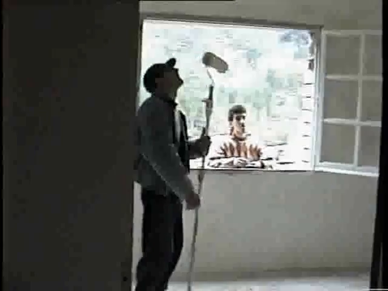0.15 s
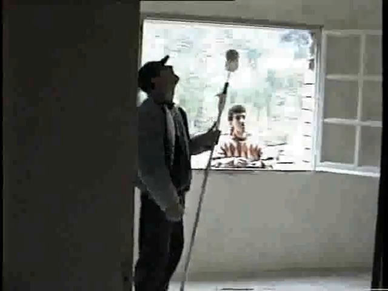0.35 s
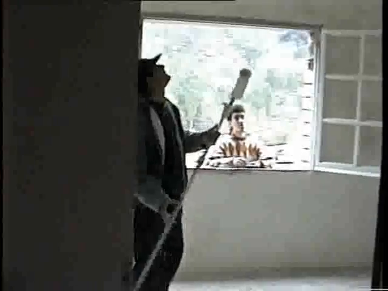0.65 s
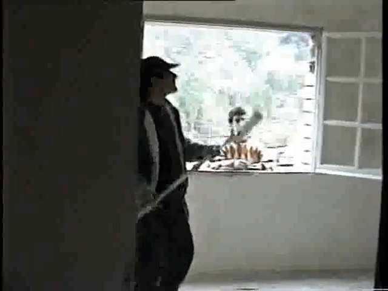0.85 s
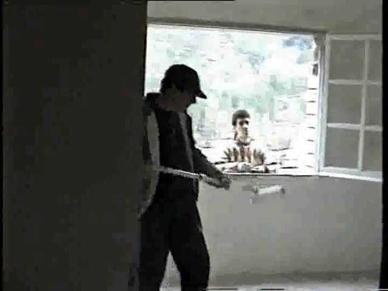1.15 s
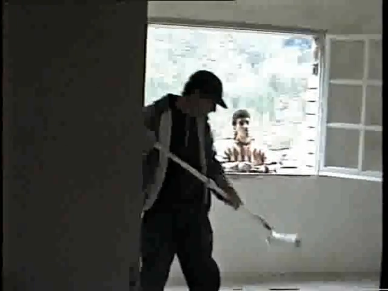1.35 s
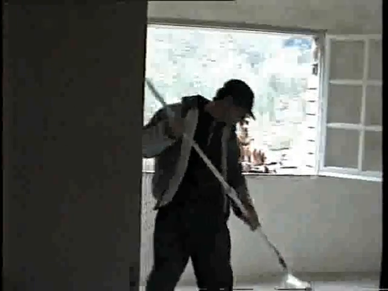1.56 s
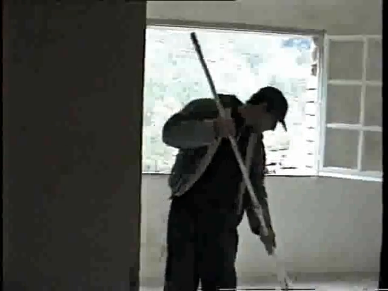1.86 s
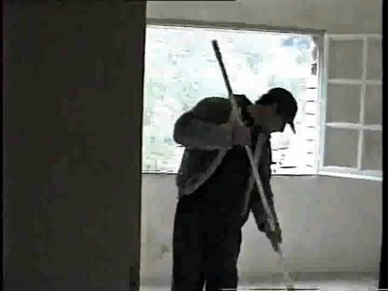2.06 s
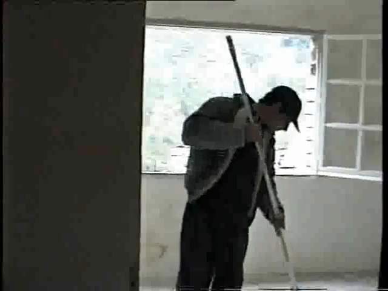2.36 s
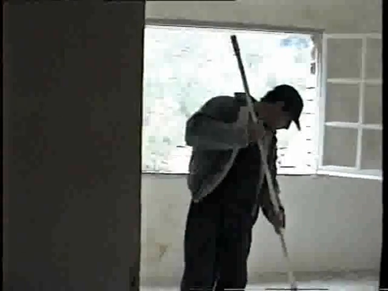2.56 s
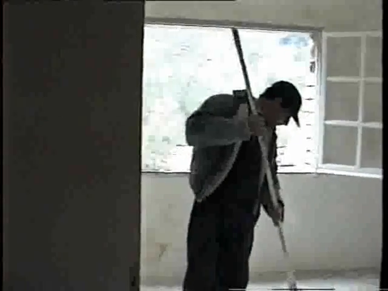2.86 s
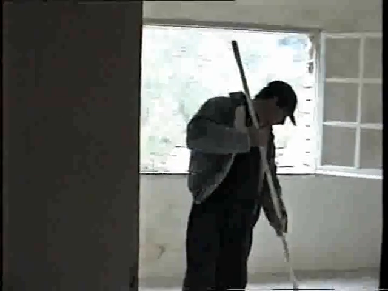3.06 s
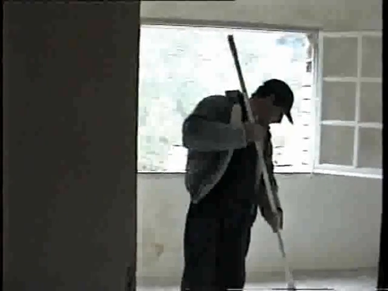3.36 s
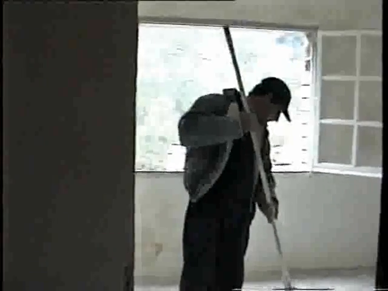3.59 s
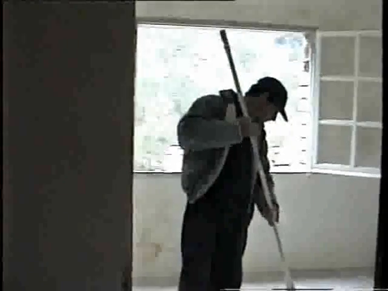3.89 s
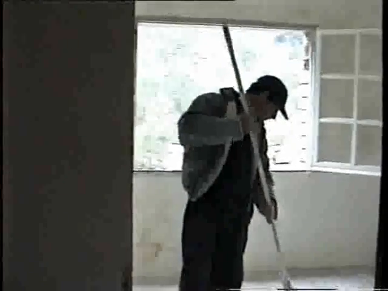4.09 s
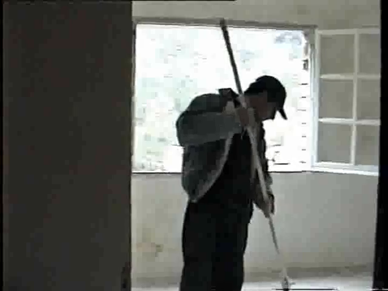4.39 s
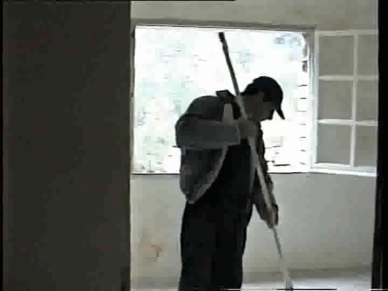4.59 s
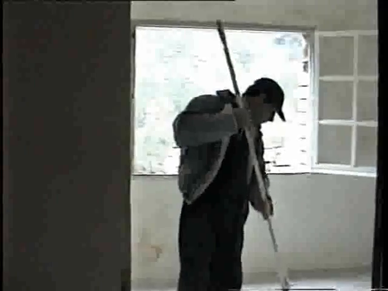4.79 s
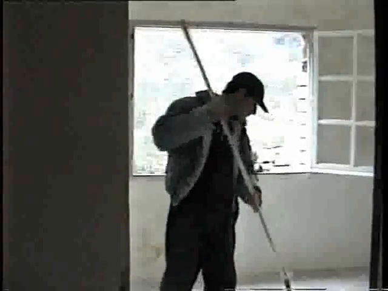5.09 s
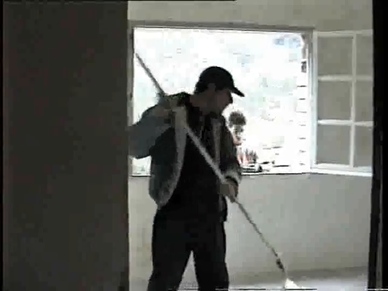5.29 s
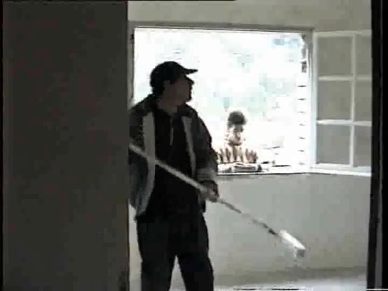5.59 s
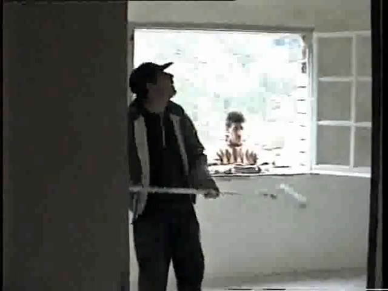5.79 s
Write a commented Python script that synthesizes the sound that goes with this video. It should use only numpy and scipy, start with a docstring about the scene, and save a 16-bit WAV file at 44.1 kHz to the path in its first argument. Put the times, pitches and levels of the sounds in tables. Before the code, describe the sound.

A painter's roller knocks down into a hollow tray and swishes wetly six times, after pole clinks and footsteps, all in strong room echo.

```python
"""In a bare, echoing room a painter lowers a roller on a long metal pole: the pole clanks, shoes scuff, clothes brush.
He turns round with a growing shuffle and rustle, then six strokes swish wetly in a paint tray that knocks and rings.
Contacts are dying bursts of tiny snaps, coloured by the body they excite; wet strokes are denser snaps that follow speed.
Outdoor air murmurs throughout; a microphone in the doorway hears mostly echo, and its gain dips at loud moments."""
import sys
import numpy as np
from scipy import signal
from scipy.fft import rfft, irfft, next_fast_len
from scipy.io import wavfile
from scipy.ndimage import uniform_filter1d, map_coordinates

SR = 44100
rng = np.random.default_rng(int(sys.argv[2]) if len(sys.argv) > 2 else 0)


def transcribe(u):
    """Save the signal u as a 16-bit wav file named by the first command-line argument.

    u: samples, shape (n,) or (channels, n), limited to [-1, 1]; the rate is SR.
    q: integer samples, one column per channel.
    """
    v = np.clip(np.atleast_2d(u).T, -1, 1)
    q = np.round(v * 32767).astype(np.int16)
    wavfile.write(sys.argv[1], SR, q)


N = 261954

# strokes in the tray: (landing time [s], landing [dB], splat [dB], rebound [dB], wait before the push [s],
# push length [s], swish [dB], far wall [dB], rebound ring [Hz])
STROKES = [(2.117, -10, -14.5, -6.5, 0.0067, 0.19, -18.5, -7.5, 2400),
           (2.997, -12.5, -25, -13, 0.0017, 0.34, -10, -11.5, 1000),
           (3.762, -28, -41, -27.5, 0.022, 0.29, -11.5, -15, 860),
           (4.375, -12.5, -24.5, -15, 0.049, 0.25, -10.5, -10, 426),
           (5.128, -14.5, -30.5, -17, 0.017, 0.25, -10.5, -29, 1630),
           (5.663, -12, -16.5, -6.5, 0.0077, 0.17, -13, -10, 1620)]
# footfalls and shifts of weight: (time [s], boom [dB], scuff [dB], boom ring [Hz])
FOOTSTEPS = [(0.005, -17, -20, 390), (0.087, -24.5, -32.5, 278), (0.422, -59, -32.5, 230),
             (0.71, -54, -31.5, 240), (0.853, -41, -21.5, 430), (1.22, -49, -29.5, 237),
             (1.479, -40, -26.5, 430), (2.398, -37.5, -50, 116), (3.276, -31.5, -26, 330),
             (4.554, -27.5, -31, 315)]
# spectrum of soft, bright rustles: (frequency [Hz], relative level [dB])
RUSTLE_SPECTRUM = [(150, -30), (500, 17), (1500, 12), (2400, 6), (3600, 5.5), (5000, 4), (9000, 0.5),
                   (12000, -6), (15000, -22)]
REBOUND_AFTER_S = 0.06  # from landing to rebound


def amp(db):
    """Decibels to an amplitude factor."""
    return 10 ** (np.asarray(db) / 20)


def unit(x):
    """Scale to rms 1."""
    return x / np.sqrt(np.mean(x ** 2) + 1e-20)


def along(points, hz):
    """Interpolate (frequency, value) points on a log frequency axis."""
    f, v = np.transpose(points)
    return np.interp(np.log(hz + 1), np.log(f + 1), v)


def coloured(x, spectrum, modes=(), size=8192):
    """Pass x through a causal body of power gain 1: a broad spectrum with resonant peaks on it."""
    hz = np.fft.rfftfreq(size, 1 / SR)
    db = along(spectrum, hz)
    for f, width, peak_db in modes:
        db = db + peak_db / (1 + (2 * (hz - f) / width) ** 2)
    # folding the cepstrum gives minimum phase: the body answers without delay
    cepstrum = irfft(np.log(unit(amp(db)) + 1e-6))
    cepstrum[1:size // 2] *= 2
    cepstrum[size // 2 + 1:] = 0
    response = irfft(np.exp(rfft(cepstrum)))
    return signal.fftconvolve(x, response)[:N]


def grains(rate, spread_db):
    """Tiny snaps of random size, rate a second on average, rms 1."""
    happens = rng.random(N) < rate / SR
    sizes = rng.standard_normal(N) * amp(spread_db * rng.standard_normal(N))
    return unit(happens * sizes)


def wobble(rate):
    """A smooth random curve, rate knots a second."""
    knots = rng.standard_normal(int(N * rate / SR) + 4)
    return map_coordinates(knots, [np.arange(N) * rate / SR])


def contacts(rows, rate, weigh_s=0.064, rise_s=0.00067, ring_width_hz=55, ring_db=6):
    """Each (time, dB, decay time, optional ring Hz) is a dying chatter of snaps plus its resonant ring.

    Before the ring is added, the chatter has the energy of weigh_s seconds at that level."""
    out, t = np.zeros(N + SR), np.arange(SR // 2) / SR
    chatter = grains(rate, spread_db=0.5)
    for s, db, decay_s, *rings in rows:
        start = max(round(s * SR), 0)
        envelope = np.exp(-t / max(decay_s, 1e-3)) * (1 - np.exp(-t / rise_s))
        burst = np.roll(chatter, -start)[:len(t)] * envelope
        burst *= amp(db) * np.sqrt(weigh_s * SR) / np.linalg.norm(burst)
        for hz in rings:
            b, a = signal.iirpeak(hz, hz / ring_width_hz, fs=SR)
            burst = burst + amp(ring_db) * signal.lfilter(b, a, burst)
        out[start:start + len(t)] += burst
    return out[:N]


def roller(uneven_db=2.6):
    """Threads of wet paint tear off the nap, louder with speed; each landing and rebound adds a splat."""
    # wet nap spectrum: (frequency [Hz], relative level [dB])
    nap_spectrum = [(30, -19), (160, -18), (240, -4.5), (400, -6), (560, 0), (700, -7.5), (950, 2),
                    (1860, -3), (3200, -2), (3900, -4.5), (6000, -4), (8400, -3.5), (12200, -9),
                    (14900, -31.5)]
    push_late, push_sharp = 1.15, 1.01  # exponents: the speed arch peaks a little after the middle of the push
    splat_decay_s = 0.029
    rebound_splat_db = -12  # relative to the rebound's knock

    t, speed = np.arange(N) / SR, np.zeros(N)
    splats = []
    for s, _, splat_db, rebound_db, wait, push, swish_db, _, _ in STROKES:
        done = np.clip((t - s - wait) / push, 0, 1)
        arch = np.abs(np.sin(np.pi * done ** push_late)) ** push_sharp
        speed += amp(swish_db) * arch
        splats.append((s, splat_db, splat_decay_s))
        splats.append((s + REBOUND_AFTER_S, rebound_db + rebound_splat_db, splat_decay_s))
    tearing = speed * amp(uneven_db * wobble(45)) * grains(rate=5900, spread_db=5.0)
    return coloured(tearing + contacts(splats, rate=8700), nap_spectrum)


def tray(level_db=0.5):
    """The hollow tray clatters at each landing, rebound and far wall, and rings more clearly when it rocks."""
    # tray spectrum: (frequency [Hz], relative level [dB])
    tray_spectrum = [(60, -18), (150, -25), (230, -13.5), (340, -6), (450, -10), (650, -1.5), (850, 4.5),
                     (1080, 1.5), (1600, -1.5), (2200, -7), (3100, -13), (4200, -20), (8000, -25.5),
                     (14000, -64)]
    # tray resonances: (frequency [Hz], width [Hz], peak [dB])
    tray_modes = [(435.6, 14.6, 16), (520, 104, 10), (824, 7.6, -1), (1000, 54, -0.5), (1160, 7, 0),
                  (1144, 48, -17), (1490, 96, 0.5), (2240, 19, 3), (2620, 80, -1), (3250, 26, 9)]
    # the tray rocks on the floor: (time [s], level before level_db [dB], decay time [s], ring [Hz])
    tray_rocks = [(2.069, -22, 0.055, 447), (2.132, -8.5, 0.018, 1056), (2.19, -9.5, 0.12, 1520),
                  (2.61, -19.5, 0.17, 1147), (5.208, -16, 0.0059, 497), (5.324, -20, 0.09, 968),
                  (5.645, -24, 0.0036, 1140)]
    landing_decay_s, rebound_decay_s, wall_decay_s = 0.019, 0.019, 0.047
    landing_hz, wall_hz = 1053, 1157  # loudest ring of the tray's bottom and of its far wall
    wall_at = 0.78  # share of the push time gone when the roller meets the far wall

    knocks = []
    for s, landing_db, _, rebound_db, wait, push, _, wall_db, rebound_hz in STROKES:
        knocks.append((s, landing_db, landing_decay_s, landing_hz))
        knocks.append((s + REBOUND_AFTER_S, rebound_db, rebound_decay_s, rebound_hz))
        knocks.append((s + wait + wall_at * push, wall_db, wall_decay_s, wall_hz))
    clatter = contacts(knocks, rate=1000, ring_width_hz=48, ring_db=3.5)
    rocking = contacts(tray_rocks, rate=810, ring_width_hz=44, ring_db=11.5)
    return amp(level_db) * coloured(clatter + rocking, tray_spectrum, tray_modes)


def pole():
    """Knocks in the hands and a jar on the first landing bend the pole; its loose joint rattles the tube."""
    # pole knocks: (time [s], ring [dB], rattle [dB], decay time [s])
    pole_knocks = [(0.0, -23.5, -17.5, 0.0019), (0.217, -33.5, -35.5, 0.012), (1.206, -24, -52, 0.032),
                   (1.239, -20.5, -48, 0.016), (1.505, -24, -34, 0.065), (2.164, -19.5, -34, 0.04)]
    # pole spectrum: (frequency [Hz], relative level [dB])
    pole_spectrum = [(100, -58), (250, 0), (430, -2.5), (800, -6.5), (1500, -9.5), (2500, -22), (4000, -27),
                     (12000, -50)]
    # bending modes of pole and roller frame: (frequency [Hz], width [Hz], peak [dB])
    bending_modes = [(435, 52, 1), (673, 6.9, -2), (1015, 150, 7.5), (1365, 18, -11), (1593, 88, 12),
                     (2415, 170, 15), (4240, 120, 10), (6060, 220, 4)]
    # loose joint spectrum: (frequency [Hz], relative level [dB])
    rattle_spectrum = [(200, -11), (900, -18), (2000, 3.5), (5000, -8.5), (8000, -6.5), (11400, -12.5),
                       (12200, -32), (15000, -39)]
    # resonances of the hollow tube: (frequency [Hz], width [Hz], peak [dB])
    tube_modes = [(930, 25, 1), (2010, 64, 7.5), (3145, 150, 9), (4260, 88, 4.5), (5000, 170, 9.5),
                  (5870, 210, 13), (7900, 340, 9), (9000, 120, 10), (11150, 200, 11)]

    ring = contacts([(s, db, decay_s) for s, db, _, decay_s in pole_knocks], rate=490)
    rattle = contacts([(s, db, decay_s) for s, _, db, decay_s in pole_knocks], rate=1500)
    return coloured(ring, pole_spectrum, bending_modes) + coloured(rattle, rattle_spectrum, tube_modes)


def floor():
    """The floor booms in its low resonances under the painter's weight."""
    # floor spectrum under a foot: (frequency [Hz], relative level [dB])
    floor_spectrum = [(50, -61), (115, -6.5), (200, -3.5), (290, -1.5), (400, -11.5), (550, -23),
                      (1500, -24), (6000, -64)]
    # floor resonances: (frequency [Hz], width [Hz], peak [dB])
    floor_modes = [(230, 66, 12), (336, 61, 2.8)]
    boom_decay_s = 0.0085

    booms = [(s, db, boom_decay_s, hz) for s, db, _, hz in FOOTSTEPS]
    thuds = contacts(booms, rate=1700, ring_width_hz=44, ring_db=10.5)
    return coloured(thuds, floor_spectrum, floor_modes)


def painter(uneven_db=3):
    """Shoes scuff at each step; as he turns, ever louder, they shuffle and his jacket rustles."""
    # shoe scuff spectrum: (frequency [Hz], relative level [dB])
    scuff_spectrum = [(90, -22), (160, -12.5), (300, -3.5), (440, 4.5), (560, -7.5), (700, -6.5),
                      (1100, -13), (1500, -13), (2200, -24), (3300, -24.5), (4200, -35), (9000, -35),
                      (14000, -49)]
    scuff_decay_s = 0.0085
    turn_start_s, turn_length_s, turn_fade_s = 0.933, 0.635, 0.042
    turn_start_db, turn_grows_db_per_s = -33, 14.5
    jacket_db = -14  # relative to the shuffle

    t = np.arange(N) / SR - turn_start_s
    turning = np.clip(np.minimum(t, turn_length_s - t) / turn_fade_s, 0, 1)
    motion = turning * amp(turn_start_db + turn_grows_db_per_s * t + uneven_db * wobble(13.6))
    scuffs = contacts([(s, db, scuff_decay_s) for s, _, db, _ in FOOTSTEPS], rate=1200)
    shuffle = motion * grains(rate=1200, spread_db=2.0)
    jacket = amp(jacket_db) * motion * grains(rate=5400, spread_db=1.0)
    return coloured(scuffs + shuffle, scuff_spectrum) + coloured(jacket, RUSTLE_SPECTRUM)


def rustles():
    """Jacket, shoes or the roller's edge brush past, and paint splats once: each soft, bright rustle is a
    short, dense chatter with a ring."""
    # brushes of jacket, shoes or the roller's edge, and a wet splat at 2.61 s: (time [s], level [dB], decay
    # time [s], loudest ring [Hz])
    brushes = [(0.224, -33.5, 0.014, 2180), (1.04, -34, 0.027, 2480), (1.495, -19.5, 0.13, 2550),
               (2.008, -26.5, 0.059, 2230), (2.61, -28, 0.021, 2380)]
    return coloured(contacts(brushes, rate=10000), RUSTLE_SPECTRUM)


def tail(build_s=0.00033):
    """Bare plaster: a dense noise echo of energy 1 whose treble dies first."""
    # reverberation: (frequency [Hz], time to fall 60 dB [s])
    decay_times = [(120, 1.13), (400, 1.28), (1000, 0.98), (2800, 0.78), (7000, 0.47), (13000, 0.36)]
    hz, t, z = signal.stft(rng.standard_normal(SR * 6 // 5), SR, nperseg=256)
    t60 = along(decay_times, hz)[:, None]
    # the root evens out the energy of slow and fast bands
    decaying = z * 10 ** (-3 * t / t60) / np.sqrt(t60)
    echo = signal.istft(decaying, SR, nperseg=256)[1]
    echo *= 1 - np.exp(-np.arange(len(echo)) / SR / build_s)
    return echo / np.linalg.norm(echo)


def room(x, direct_db=-13, count=8, size=1600):
    """A weak direct sound under a strong echo whose fine pattern keeps shifting."""
    # count echo patterns take turns, fading into one another every size samples
    turn = np.arange(N) / size
    wet = 0
    for k in range(count):
        away = np.abs((turn - k + 1) % count - 1)
        share = np.cos(np.pi / 2 * np.minimum(away, 1))
        wet = wet + signal.oaconvolve(x * share, tail())[:N]
    return wet + amp(direct_db) * x


def background(level_db=-37.0):
    """Outdoor air through the open window, with a faint hiss: coloured noise that gently swells and sinks."""
    # air spectrum: (frequency [Hz], relative level [dB])
    air_spectrum = [(25, -11), (65, -23), (130, -3), (215, 1.5), (425, 1.5), (950, -2), (1500, -2),
                    (3300, -11), (3900, -18), (9700, -20), (13400, -34), (14900, -59)]
    return amp(level_db + wobble(3.47)) * coloured(rng.standard_normal(N), air_spectrum)


def scene(lean=0.011, lean_below_hz=1900):
    """One microphone feeds both channels; the lows lean a little to the left."""
    sources = roller() + tray() + pole() + floor() + painter() + rustles()
    mono = room(sources) + background()
    lowpass = signal.butter(4, lean_below_hz, fs=SR, output="sos")
    side = lean * signal.sosfiltfilt(lowpass, mono)
    return np.array([mono + side, mono - side])


def gain_control(x, limit_db=-10, excess_falls_db_per_s=45, squeeze=0.48):
    """The gain drops at once when the sound is loud and creeps back."""
    power = uniform_filter1d(np.mean(x ** 2, axis=0), size=400)
    excess_db = np.maximum(10 * np.log10(np.abs(power) + 1e-12) - limit_db, 0)
    # hold each peak of excess and let it fall at a steady pace
    creep = excess_falls_db_per_s * np.arange(N) / SR
    held_db = np.maximum.accumulate(excess_db + creep) - creep
    return x * amp(-min(squeeze, 1) * held_db)  # squeeze: share of the held excess taken off


def record(dry, hardness=6, ceiling=1.05, top_hz=14800):
    """The microphone's gain is ridden, peaks are rounded off and nothing from top_hz up is kept."""
    x = gain_control(dry)
    x = x / (1 + np.abs(x / ceiling) ** hardness) ** (1 / hardness)
    m = next_fast_len(N + SR // 2)
    kept = np.fft.rfftfreq(m, 1 / SR) < top_hz
    return irfft(rfft(x, m) * kept, m)[:, :N]


dry = scene()
out = record(dry)
transcribe(out)
```